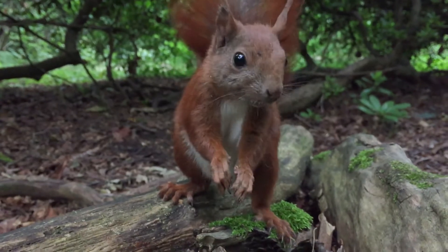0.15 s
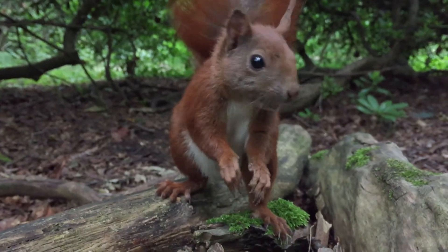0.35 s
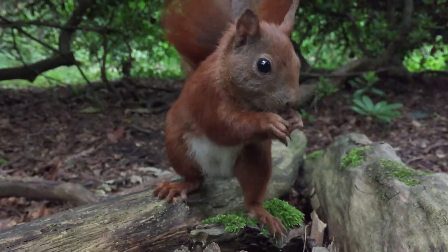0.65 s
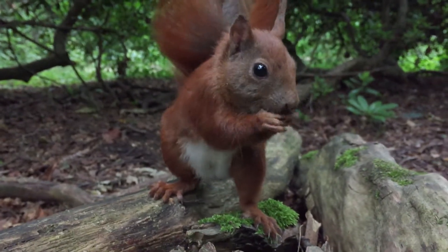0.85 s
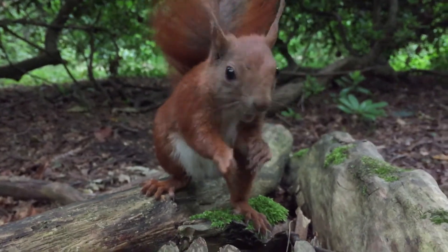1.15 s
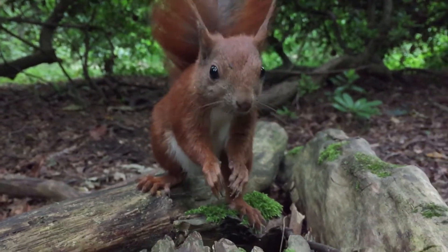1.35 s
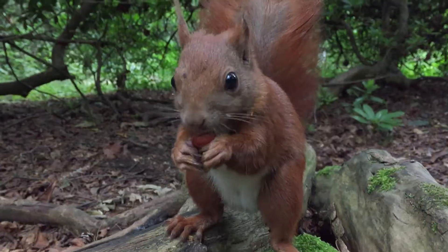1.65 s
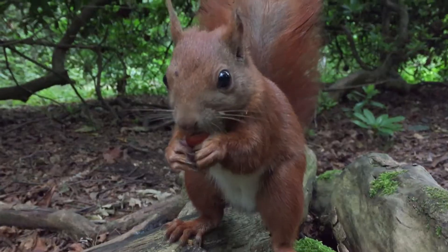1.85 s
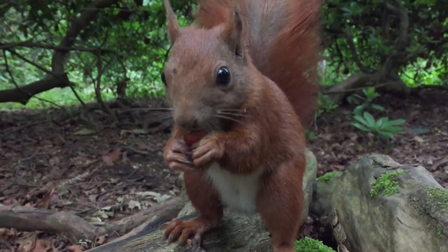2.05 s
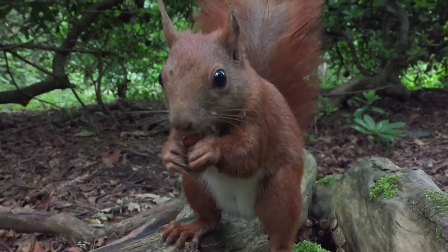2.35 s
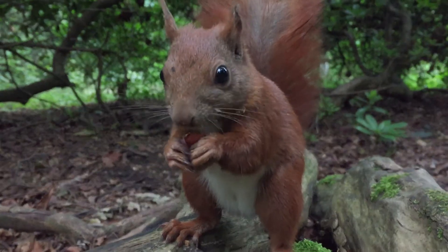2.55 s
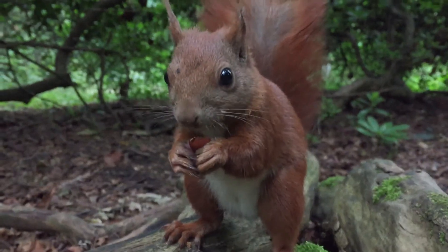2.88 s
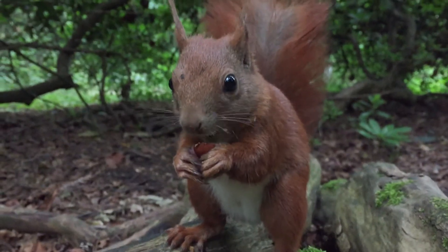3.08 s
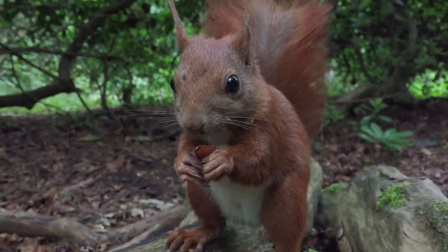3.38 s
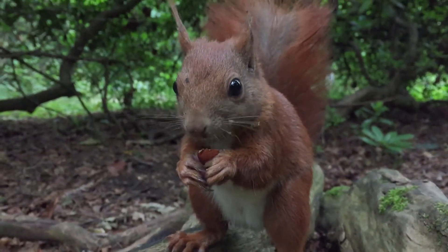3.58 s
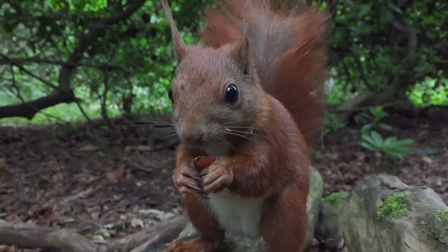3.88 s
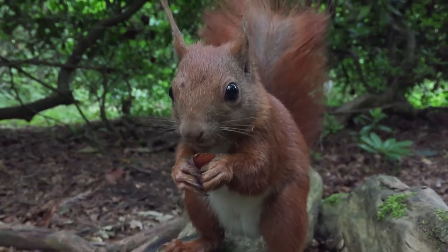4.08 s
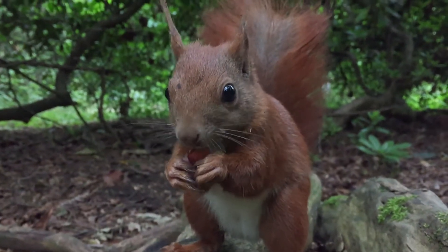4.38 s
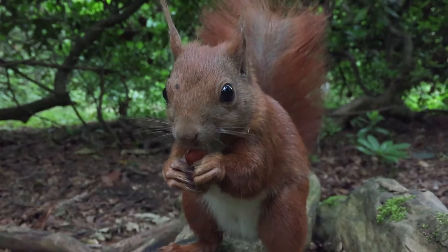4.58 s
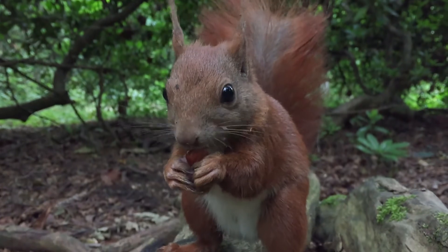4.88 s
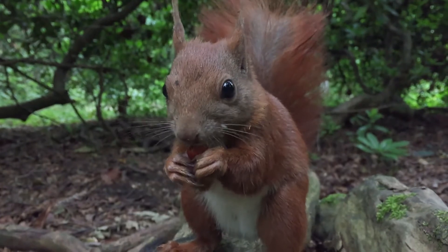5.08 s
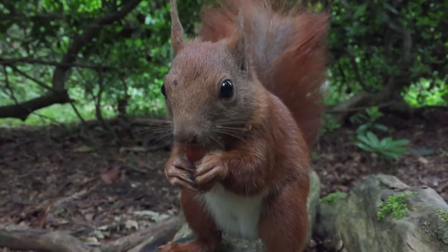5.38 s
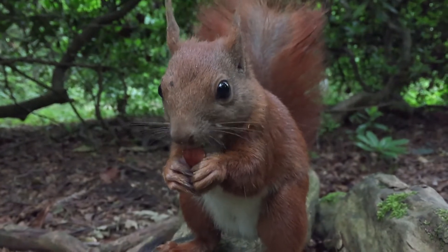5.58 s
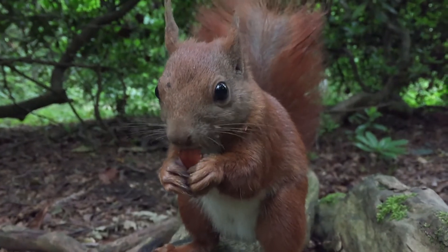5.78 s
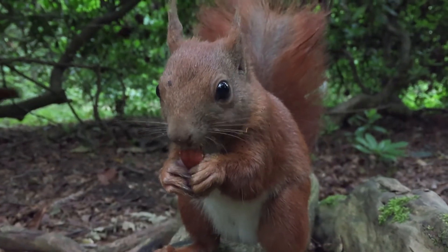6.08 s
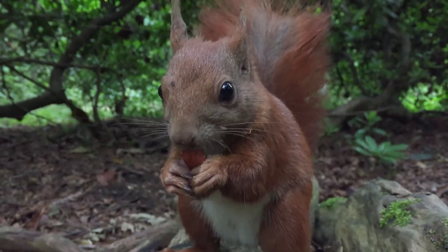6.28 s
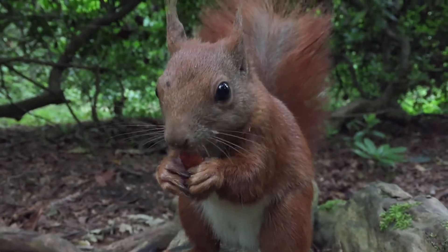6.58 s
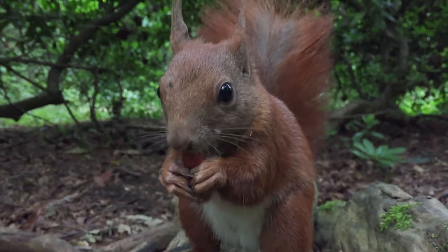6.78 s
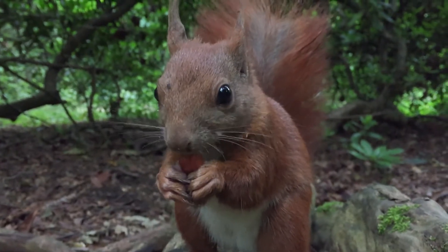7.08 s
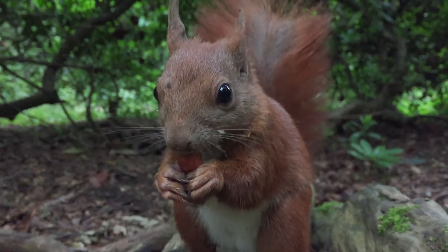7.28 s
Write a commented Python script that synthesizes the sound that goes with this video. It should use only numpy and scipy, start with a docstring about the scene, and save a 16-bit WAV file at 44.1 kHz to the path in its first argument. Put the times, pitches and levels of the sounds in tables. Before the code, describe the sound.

A squirrel very close to the microphone lets out two short fluttering squeals in the first two seconds, with a tiny squeak and low grunts. Then it gnaws a nut: sparse brittle ticks, dry rasping scrapes and three sharp shell cracks. Thin birds chirp and whistle in the trees with a slight diffuse echo, over a steady low rumble and soft woodland hush.

```python
"""Squirrel gnawing a nut

A red squirrel on a log, very close, gives two fluttering squeals, a squeak and soft grunts: a pulsed
voice filtered by the throat. It gnaws a nut: noise bursts make the tooth ticks, grained noise the dry
rasping, and struck damped modes the three cracks of the shell. Small birds call thinly in the trees
as gliding tones with a diffuse echo, over a steady low rumble and a soft hush of shaped noise."""
import sys
import numpy as np
from scipy import signal
from scipy.fft import rfft, irfft
from scipy.io import wavfile
from scipy.ndimage import uniform_filter1d

SR = 44100
rng = np.random.default_rng(int(sys.argv[2]) if len(sys.argv) > 2 else 0)


def unload_audio(sound):
    """Save the sound as a 16-bit wav file, at the path given as the first command line argument."""
    columns = np.transpose(np.atleast_2d(sound))
    # keep every value between -1 and 1, then stretch to whole-number steps
    steps = np.round(np.clip(columns, -1, 1) * 32767)
    wavfile.write(sys.argv[1], SR, steps.astype(np.int16))


N = 328104   # length [samples]

# Levels in the tables are relative: the functions balance the layers further.
# far rumble: (frequency [Hz], spectral density [dB])
RUMBLE_SPECTRUM = [(13, -77), (22, -46), (27, -14), (29, -22), (34, -39), (45, -2.5), (70, 3), (102, -4),
                   (173, -11.5), (200, -17.5), (259, -20), (320, -37.5), (420, -36), (700, -120)]
# hush of the wood: (frequency [Hz], spectral density [dB])
HUSH_SPECTRUM = [(160, -53), (280, 0.5), (481, -7), (722, -2), (1260, -4), (1550, -9), (2100, -11.5),
                 (2620, -17.5), (2940, -19), (3370, -21.5), (3610, -21), (7470, -29), (7990, -49),
                 (14200, -30), (16000, -37)]
RUMBLE_DB, HUSH_DB = -42.5, -59.5
# brief dip of the whole sound: (time [s], level [dB])
LEVEL_DIP = [(1.488, 0), (1.498, -35), (1.515, -35), (1.54, 0)]
CUTOFF_HZ = 16200

# faint wavering tones in the distance:
# (start [s], length [s], first pitch [Hz], last pitch [Hz], level [dB])
DISTANT_TONES = [(.92, 0.055, 1325, 1293, -59), (.99, 0.076, 1653, 1675, -61),
                 (1.10, 0.056, 1494, 1564, -59.5), (1.26, 0.13, 390, 441, -60.5),
                 (1.30, 0.228, 1013, 967, -60), (1.36, 0.098, 1203, 1210, -58)]
# phrases of thin far whistles: (start [s], notes [count], time per note [s], first pitch [Hz],
# glide within a note [semitones], step to the next note [semitones], level [dB])
WHISTLE_PHRASES = [(0, 1, 0.081, 7330, 1, 0, -66.5), (0.151, 2, .21, 6670, -0.8, -.5, -66),
                   (.93, 2, 0.15, 6310, .2, .3, -62), (4.19, 4, 0.088, 5230, 1, 0, -70),
                   (5.725, 1, 0.056, 6690, -1.4, 0, -66), (6.559, 5, .09, 8060, -2, -1, -65.5),
                   (7.21, 1, 0.33, 7200, -0.4, 0, -67.5)]
WHISTLE_SHARE = .75   # part of its time that a note sounds
# rising hoarse bird chirps: (time [s], resonance at the start [Hz], level [dB])
BIRD_CHIRPS = [(1.552, 3700, -47), (1.665, 3120, -48), (1.790, 3250, -47.5), (2.12, 4266, -51),
               (2.215, 3720, -52.5), (4.893, 6100, -60.5), (5.911, 4930, -46.5)]
# partials of a chirp: (multiple of the pitch [ratio], level [dB])
HOARSE_PARTIALS = [(3, 5), (4, 7), (5, 2), (5.5, -1.5), (6, 3.5), (7.5, -2.5), (8, -1)]
# nominal pitch at the ends of a chirp, and the resonance of the open beak
CHIRP_S, CHIRP_FIRST_HZ, CHIRP_LAST_HZ, OPEN_BEAK_HZ = .057, 830, 1157, 7030
CHIRP_WAVER = .024   # spread of each partial's frequency, as a share

# scraping noise: (frequency [Hz], spectral density [dB])
RASP_SPECTRUM = [(1800, 0), (3000, 1.5), (4500, 3), (7000, 4), (9300, 2), (10600, -1), (13000, 1),
                 (16000, -2)]
# scraping strokes of claws and teeth: (start [s], length [s], level [dB])
SCRAPE_STROKES = [(0.229, 0.045, -56.5), (0.7, 0.28, -51.5), (1.847, 0.043, -56), (1.95, 0.21, -62.5),
                  (2.66, 0.022, -60), (2.878, 0.032, -58.5), (4.696, .1, -57.5), (5.508, 0.28, -57),
                  (6.015, 0.08, -53.5), (6.384, 0.06, -47.5), (6.44, 0.056, -46), (6.628, 0.044, -49.5),
                  (6.704, 0.091, -56)]
# a stroke bites in, weakens and lets go
STROKE_ATTACK_S, STROKE_RELEASE_S, STROKE_FADE_DB = 0.01, 0.033, 12
RUSTLE_DB = -70   # relative level of the faint rubbing beneath the strokes

# the clearest tooth ticks: (time [s], bright edge level [dB], nut body level [dB])
CLEAR_TICKS = [(2.289, -46, -64), (2.549, -43, -69), (2.687, -37, -62), (2.898, -28, -54),
               (3.2166, -43, -52.5), (3.227, -43, -50), (3.5633, -40, -49.5), (3.57, -39, -47.5),
               (3.672, -42, -74), (3.9058, -43, -49.5), (4.2043, -40, -71), (4.367, -45, -67),
               (4.742, -41, -73), (5.168, -49, -73), (5.4004, -39, -70), (5.699, -29.5, -51.5),
               (6.0337, -42, -49.5), (7.003, -39, -66)]
# dull part of a tick: (frequency [Hz], spectral density [dB])
TICK_BODY_SPECTRUM = [(1200, -22), (2400, 8), (3900, 19), (5000, 3), (7000, -4), (11000, -44)]
# bright part of a tick: (frequency [Hz], spectral density [dB])
TICK_EDGE_SPECTRUM = [(4000, -2), (7000, -33), (9300, -7), (10600, -1), (13000, 13.5), (16000, 9)]
TICK_TAIL_S = .011
GNAW_START_S, FAINT_TICKS_PER_S = 4.4, 2.5   # fainter ticks fall at random, at this mean rate
FAINT_EDGE_DB, FAINT_BODY_DB, FAINT_SPREAD_DB = -53, -65, 2.5   # relative levels

# shell cracks: (time [s], peak level [dB], middle modes [dB], high modes [dB])
SHELL_CRACKS = [(2.248, -23, -0.5, -7), (5.3130, -25, -2.5, -2), (6.776, -23.5, -10, 5.5)]
# damped modes of the shell: (frequency [Hz], bandwidth [Hz], level [dB])
SHELL_MODES = [(970, 340, -4), (1600, 710, 2.5), (2740, 1560, 10), (3880, 1150, 6), (6400, 1100, -5.5),
               (9650, 630, -8.5), (12850, 2600, -4), (15100, 860, -6.5)]

# transfer function of the throat: (frequency [Hz], gain [dB])
THROAT_GAIN = [(300, 8.5), (600, 4.5), (1000, 0.5), (1400, -12), (2250, -20), (2900, -50), (3800, -30.5),
               (4600, -29), (5900, -29.5), (6800, -42), (9500, -54.5), (16000, -76)]
# air rushing through the throat: (frequency [Hz], spectral density [dB])
THROAT_AIR_SPECTRUM = [(300, -21), (1000, 26), (1500, -13), (2200, -9), (3000, -16), (4800, -8), (7000, 17),
                       (10000, -27.5), (16000, 4)]
# flutter rate, slower while the voice is slack: (pitch [Hz], rate [flutters/s])
FLUTTER_RATE = [(800, 74), (950, 88)]
# flutter, slight in the lowest voice, deepest just above it and dying away as the pitch rises:
# (pitch [Hz], depth [0-1])
FLUTTER_AMOUNT = [(340, .1), (450, 1), (520, 1), (750, .65), (1100, .35), (1500, .03)]
WHISTLE_REGISTER_HZ = 2000   # no flutter from here up
# two squeals, each a rise and a fall; the first fall opens with a whistle, then the voice breaks.
# One curve a syllable: (time [s], pitch [Hz], level [dB], rasp [0-1])
SQUEAL_CURVES = [
    [(.629, 298, -37.5, 0.08), (.662, 423.4, -34.5, 0), (.672, 746.5, -33.5, 0.7), (.682, 1233, -30, 0.8),
     (.688, 1256, -40.5, 1), (.698, 1134, -38, 1)],
    [(.757, 5300, -27.5, 0), (.773, 4440, -34, .03), (.777, 3670, -41, .15), (.783, 3330, -29.5, 0.23)],
    [(.786, 1512, -35, 0.16), (.794, 1294, -33, 0.07), (.798, 1060, -20.5, 0.1), (.806, 988, -26, 0.18),
     (.809, 789.6, -32, 0.84), (.822, 497.3, -34, 0.48), (.883, 460, -33, 0.63), (.888, 947, -47, 1),
     (.922, 790, -49, 0.75)],
    [(1.812, 499.4, -34.5, 0.71), (1.823, 718, -31.5, 0.66), (1.833, 951, -24, 0.32),
     (1.849, 1096, -28, 0.27), (1.856, 1516, -36, 0.33), (1.871, 1780, -38, .5)],
    [(1.889, 1644, -31, 1), (1.912, 1118, -26.5, .12), (1.945, 1107, -25, 0.17), (1.951, 1576, -33, 0.1),
     (1.956, 1087, -27, 0.07), (2.033, 949, -26, 0.2), (2.040, 700, -28.5, 0.53), (2.093, 791, -29, 0.42)],
]
# a squeak and soft grunts: (start [s], length [s], pitch [Hz], level [dB], rasp [0-1])
SHORT_NOTES = [(0.705, 0.0053, 5080, -33.5, 0), (2.676, 0.04, 309, -35.5, 0.52),
               (3.517, 0.0093, 460, -45, .8), (4.908, .016, 598, -45.5, 0.23),
               (4.933, 0.018, 633, -42.5, 0.04)]
NOTE_SAG, NOTE_FADE_DB = 0.0484, 7.5   # share of pitch, and level, that a short note loses by its end


def from_db(db):
    """Amplitude gain is ten to the power of decibels over twenty."""
    return 10 ** (np.asarray(db) / 20)


def rms_one(x):
    """Dividing by the root mean square gives unit power."""
    return x / np.sqrt(np.mean(x ** 2) + 1e-20)


def in_time(rows):
    """Linear interpolation turns breakpoints into a curve, sample by sample."""
    return np.interp(np.arange(N) / SR, *np.transpose(rows))


def gain_at(spectrum, hz):
    """A spectrum's gain is read in decibels along a logarithmic frequency axis."""
    points_hz, db = np.transpose(spectrum)
    return from_db(np.interp(np.log(hz + 1e-9), np.log(points_hz), db))


def noise(spectrum, size):
    """Filtered white noise of unit power falls steeply beyond the ends of its spectrum."""
    hz = np.arange(size // 2 + 1) * SR / size + 1e-3
    low_skirt = 1 + (spectrum[0][0] / hz) ** 12
    high_skirt = 1 + (hz / spectrum[-1][0]) ** 12
    response = gain_at(spectrum, hz) / np.sqrt(low_skirt * high_skirt)
    return rms_one(irfft(rfft(rng.standard_normal(size)) * response, size))


def drift(rate, size):
    """A random modulator joins normal values of spread 1, drawn rate times a second, by straight lines."""
    knots = rng.standard_normal(size // 8 + 2)
    return np.interp(np.arange(size) * rate / SR, np.arange(len(knots)), knots)


def add(out, s, sound):
    """Superposition: a sound is summed in at its time."""
    at = max(round(s * SR), 0)
    out[at:at + len(sound)] += sound[:max(N - at, 0)]


def soften(x, seconds):
    """Two moving averages round the corners of a control."""
    width = max(int(seconds * SR), 1)
    return uniform_filter1d(uniform_filter1d(x, width), width)


def patchy(x, depth_db, rate):
    """Slow modulation of six interleaved sets of narrow bands makes a noise uneven, at unit power."""
    spectrum, hz = rfft(x), np.arange(N // 2 + 1) * SR / N
    band_set = np.floor(8 * np.log2(1 + hz / 500)) % 6
    total = np.zeros(N)
    for k in range(6):
        total += irfft(spectrum * (band_set == k), N) * from_db(depth_db * drift(rate, N))
    return rms_one(total)


def background():
    """Broadband ambience: a far steady rumble plus a soft hush whose narrow bands wander in level."""
    rumble = from_db(RUMBLE_DB) * noise(RUMBLE_SPECTRUM, N)
    hush = from_db(HUSH_DB) * patchy(noise(HUSH_SPECTRUM, N), depth_db=4, rate=18)
    return rumble + hush


def trees(x, t60):
    """Scattering by trunks and leaves: convolution with decaying noise gives a short diffuse echo."""
    age = np.arange(SR // 2) / SR
    build_up = 1 - np.exp(-age / 0.0061)
    echo = rng.standard_normal(len(age)) * from_db(-60 * age / t60) * build_up
    unit_energy = rms_one(echo) / np.sqrt(len(age))
    return signal.fftconvolve(x, unit_energy)[:N]


def whistles(notes, waver, level_db):
    """Frequency modulation: a thin gliding sine has an unsteady pitch."""
    out = np.zeros(N)
    for s, length, first_hz, last_hz, db in notes:
        u = np.linspace(0, 1, int(length * SR))
        glide = first_hz + (last_hz - first_hz) * u
        pitch = glide * (1 + waver * drift(450, SR)[:len(u)])
        tone = np.sin(2 * np.pi * np.cumsum(pitch) / SR)
        add(out, s, from_db(db + level_db) * rms_one(tone * np.sqrt(u * (1 - u))))
    return out


def phrase_notes():
    """Equal frequency ratios: a bird repeats one gliding note at an even pace, its pitch stepping."""
    semitone, notes = 2 ** (1 / 12), []
    for s, count, pace, hz, glide, step, db in WHISTLE_PHRASES:
        for k in range(round(count)):
            first_hz = hz * semitone ** (k * step)
            last_hz = hz * semitone ** (k * step + glide)
            notes.append((s + k * pace, WHISTLE_SHARE * pace, first_hz, last_hz, db))
    return notes


def chirps(hoarse_db=5.0, focus=0.074, variety=0.0245):
    """Moving resonance: an opening beak sweeps up through hoarse partials as the pitch rises and levels."""
    out, u = np.zeros(N), np.linspace(0, 1, int(CHIRP_S * SR))
    for s, first_peak_hz, db in BIRD_CHIRPS:
        rise = CHIRP_LAST_HZ + (CHIRP_FIRST_HZ - CHIRP_LAST_HZ) * (1 - u) ** 2
        pitch = rise * (1 + variety * rng.uniform(-0.85, 1))
        beak = first_peak_hz + (OPEN_BEAK_HZ - first_peak_hz) * u
        tone = 0
        for k, partial_db in HOARSE_PARTIALS:
            hz = k * pitch * (1 + CHIRP_WAVER * drift(886, SR)[:len(u)])
            strength = from_db(partial_db + hoarse_db * drift(235, SR)[:len(u)])
            resonance = 1 / np.hypot(1, np.log(hz / beak) / focus)
            tone = tone + strength * resonance * np.sin(2 * np.pi * np.cumsum(hz) / SR)
        add(out, s, from_db(db) * rms_one(tone * np.sin(np.pi * u)))
    return out


def rasping(level_db=-3, grain_db=1.5, scrape_db=2.5, restless_db=3.0):
    """Friction: teeth and claws scrape in uneven grains; the colour shifts as the contact moves."""
    pressure = from_db(RUSTLE_DB + restless_db * drift(14, N))
    age = np.arange(SR // 2) / SR
    for s, length, db in SCRAPE_STROKES:
        attack = np.minimum(age / STROKE_ATTACK_S, 1)
        release = np.clip(1 + (length - age) / STROKE_RELEASE_S, 0, 1)
        weakening = from_db(db - STROKE_FADE_DB * age / length)
        add(pressure, s, attack * release * weakening)
    grains = rms_one(from_db(grain_db * drift(900, N) + scrape_db * drift(70, N)))
    scrape = patchy(noise(RASP_SPECTRUM, N), depth_db=5, rate=55)
    return from_db(level_db) * pressure * grains * scrape


def faint_ticks(count=24):
    """Random intervals: light touches of the teeth, as rows like those of the clear ticks."""
    times = GNAW_START_S + np.cumsum(rng.uniform(0, 2, count)) / FAINT_TICKS_PER_S
    offsets_db = FAINT_SPREAD_DB * rng.standard_normal(count)
    return [(s, FAINT_EDGE_DB + db, FAINT_BODY_DB + db) for s, db in zip(times, offsets_db)]


def ticks(body_db=1, edge_db=-7, body_s=0.0036, edge_s=0.00087, tail_db=-21):
    """Brittle fracture: a tooth chips off a flake in a tiny noise burst with a short crumbling tail."""
    out, age = np.zeros(N), np.arange(SR // 20) / SR
    tail = from_db(tail_db) * np.exp(-age / TICK_TAIL_S)
    body_decay = np.exp(-age / body_s) + tail
    edge_decay = np.exp(-age / edge_s) + tail
    for s, treble_db, nut_db in list(CLEAR_TICKS) + faint_ticks():
        body = from_db(nut_db + body_db) * noise(TICK_BODY_SPECTRUM, len(age)) * body_decay
        edge = from_db(treble_db + edge_db) * noise(TICK_EDGE_SPECTRUM, len(age)) * edge_decay
        add(out, s, body + edge)
    return out


def cracks(crumb_db=-32, crumb_s=0.0078, level_db=1, split_s=.0007, split_db=-4):
    """Impulse response: a snap, a split an instant later and crumbs ring the shell's heavily damped modes."""
    out, age = np.zeros(N), np.arange(SR // 30) / SR
    for s, db, middle_db, high_db in SHELL_CRACKS:
        push = from_db(crumb_db) * rng.standard_normal(len(age)) * np.exp(-age / crumb_s)
        push[0] += 1
        push[round(split_s * SR)] += from_db(split_db)
        # where the shell breaks decides which modes take the blow
        colour = [(1500, 0), (2700, middle_db), (4000, middle_db), (7000, high_db)]
        ring = np.zeros(len(age))
        for k, (hz, width, mode_db) in enumerate(SHELL_MODES):
            strength = (-1) ** k * from_db(mode_db) * gain_at(colour, hz)
            ring += strength * np.exp(-np.pi * width * age) * np.sin(2 * np.pi * hz * age)
        snap = signal.fftconvolve(push, ring)[:len(age)]
        add(out, s, from_db(db + level_db) * snap / np.abs(snap).max())
    return out


def syllables():
    """Pitch and level contours: the squeals, and the short notes, which sag and fade."""
    curves = list(SQUEAL_CURVES)
    for s, length, hz, db, rasp in SHORT_NOTES:
        end = (s + length, hz * (1 - NOTE_SAG), db - NOTE_FADE_DB, rasp)
        curves.append([(s, hz, db, rasp), end])
    return curves


def fluttered(curve, bend=.625):
    """Joint modulation: below the whistle register, flutter pulls pitch and level down in arches."""
    times, *columns = np.transpose(curve)
    clock = np.arange(times[0], times[-1], 1 / SR)
    pitch, db, rasp = [np.interp(clock, times, column) for column in columns]
    depth = np.clip(np.interp(pitch, *np.transpose(FLUTTER_AMOUNT)), 0, 1)
    rate = np.interp(pitch, *np.transpose(FLUTTER_RATE)) * (pitch < WHISTLE_REGISTER_HZ)
    arch = np.abs(np.sin(np.pi * np.cumsum(rate) / SR)) - 2 / np.pi   # less the mean of an arch
    throb = np.maximum(1 + 1.5 * depth ** 1.5 * arch, 0)
    return pitch * (1 + bend * np.minimum(depth, .6) * arch), from_db(db) * throb, rasp


def squeals(jitter=0.176, shimmer=0.36, air_db=-34, rasp_air_db=-26.0, overtone_db=4.5, hiss_hz=850):
    """Source and filter: a tiny larynx slides and jumps; its pulses and escaping air pass the throat."""
    controls = np.zeros((4, N))
    for curve in syllables():
        pitch, level, rasp = fluttered(curve)
        for track, values in zip(controls, (np.ones(len(pitch)), pitch, level, rasp)):
            add(track, curve[0][0], values)
    gate, pitch, level, rasp = [soften(track, .0012) for track in controls]
    # only the voiced samples are computed; dividing by the gate averages overlaps
    on = gate > 1e-3
    pitch, rasp = pitch[on] / gate[on], rasp[on] / gate[on]
    level = level[on] / np.maximum(gate[on], 1)
    size = len(pitch)

    # rasp makes the cycles uneven in length and strength
    pitch = pitch * (1 + jitter * (rasp + 0.069) * drift(900, size))
    level = level * (1 + shimmer * rasp * drift(700, size))
    phase = 2 * np.pi * np.cumsum(pitch) / SR
    orders = np.arange(1, 15)[:, None]
    # the higher the overtone, the more its strength wanders
    wander_db = np.array([drift(128.5, size) for _ in orders])
    wander = from_db(overtone_db * (1 - 1 / orders) * wander_db)
    overtone_hz = orders * pitch
    weights = wander * gain_at(THROAT_GAIN, np.abs(overtone_hz)) * (overtone_hz < CUTOFF_HZ)
    # the throat delays the overtones, which rounds each pulse
    pulses = np.sum(weights * np.cos(orders * phase - np.pi * np.log(orders)), axis=0)
    tone = pulses / np.sqrt(np.sum(weights ** 2, axis=0) / 2 + 1e-20)

    # air escapes once a cycle and follows the flutter only loosely
    puffs = noise(THROAT_AIR_SPECTRUM, N)[:size] * (1 + np.cos(phase))
    air = puffs * (from_db(air_db) + rasp * from_db(rasp_air_db))
    # tight notes hiss more than slack ones, but the highest notes are free of air
    air = air * np.clip(pitch / hiss_hz, .3, 1.5) * (pitch < 3000)
    out = np.zeros(N)
    out[on] = level * tone + soften(level, 0.021) * air
    return out


def scene():
    """Direct-to-diffuse ratio: the squirrel is near and almost dry, the distant sounds echo in the trees."""
    far_whistles = whistles(phrase_notes(), waver=0.034, level_db=1.0)
    far_tones = whistles(DISTANT_TONES, waver=0.049, level_db=1.5)
    distant = chirps() + far_whistles + far_tones
    far = from_db(-5.5) * distant + from_db(-6.5) * trees(distant, t60=0.23)
    squirrel = rasping() + ticks() + cracks() + squeals()
    near = squirrel + from_db(-27) * trees(squirrel, t60=.2)
    return (background() + far + near)[None]


def record(dry):
    """Gain and low-pass filtering: the level dips once, briefly; the top is cut."""
    top_cut = signal.ellip(10, .1, 70, CUTOFF_HZ, fs=SR, output="sos")
    return signal.sosfilt(top_cut, dry * from_db(in_time(LEVEL_DIP)))


dry = scene()
out = record(dry)
unload_audio(out)
```